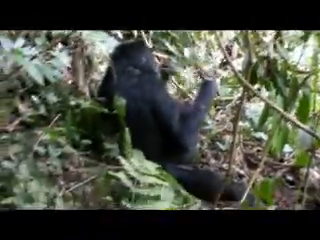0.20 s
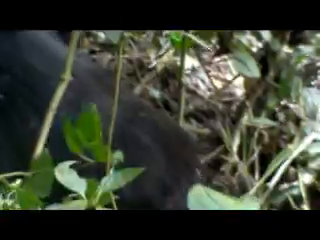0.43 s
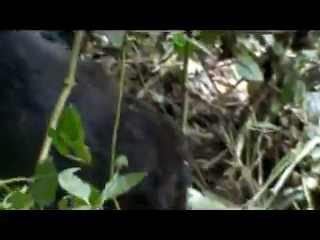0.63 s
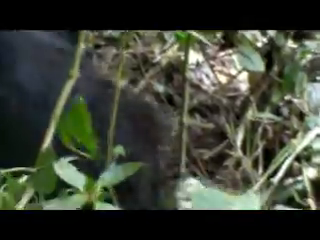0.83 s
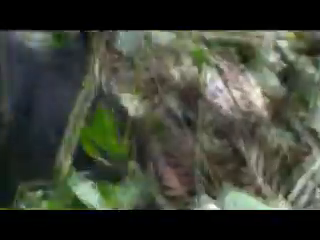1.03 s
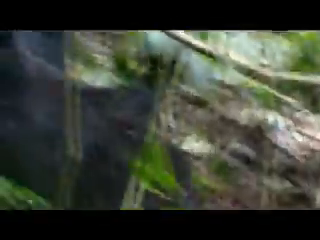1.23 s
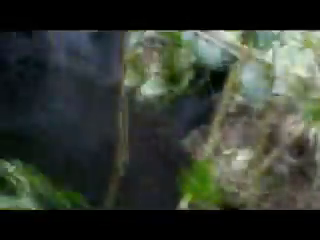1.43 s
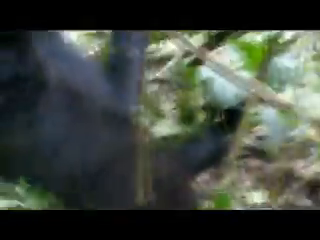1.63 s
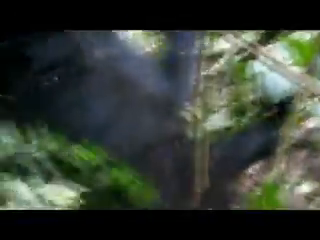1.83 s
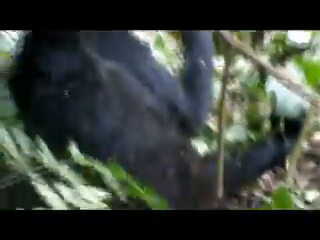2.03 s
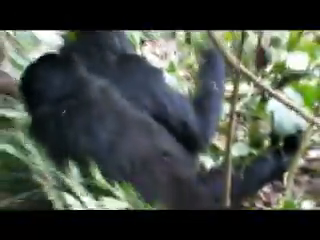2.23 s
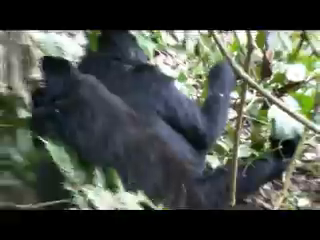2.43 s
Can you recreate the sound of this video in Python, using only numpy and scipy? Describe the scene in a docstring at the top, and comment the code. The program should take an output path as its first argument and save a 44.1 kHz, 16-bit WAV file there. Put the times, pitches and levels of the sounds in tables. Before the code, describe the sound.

Leaves and stems rustle as gorillas pull at plants, with sharp twig snaps and shrilling insects

```python
"""Dense forest undergrowth, where gorillas shift about and pull at plants.
Each pull makes leaves and litter rustle: a swell of tiny clicks and hiss, with short leaf rings.
Twigs snap as a click and a noise spray, a thick stem splinters in jerks, and limbs knock as damped tones.
Insects shrill behind as narrow bands of noise, over a wash of distant foliage and a faint drone.
Early on the whole sound drops out for an instant, then returns slightly louder."""
import sys
import numpy as np
from scipy import signal
from scipy.fft import rfft, irfft
from scipy.io import wavfile

SR = 44100
rng = np.random.default_rng(int(sys.argv[2]) if len(sys.argv) > 2 else 0)


def transcribe(u):
    """Save the signal u as a 16-bit wav file named by the first command-line argument.

    u: samples, shape (n,) or (channels, n), limited to [-1, 1]; the rate is SR.
    q: integer samples, one column per channel.
    """
    v = np.clip(np.atleast_2d(u).T, -1, 1)
    q = np.round(v * 32767).astype(np.int16)
    wavfile.write(sys.argv[1], SR, q)


N = 114660
T = np.arange(N) / SR  # time of every sample, in seconds

# Pulls through the foliage: peak_s, rise_s, fall_s, crisp_leaves_db, dull_litter_db
FOLIAGE_PULLS = [(.15, 0.031, 0.05, -60, -54.5), (0.224, 0.047, 0.024, -47, -52),
                 (.32, 0.069, 0.14, -46.5, -50.5), (0.475, 0.034, 0.03, -44, -51.5),
                 (0.537, 0.037, 0.024, -40.5, -68), (0.603, 0.02, 0.2, -59, -53),
                 (0.685, 0.026, 0.066, -49.5, -42.5), (0.763, 0.033, 0.1, -50, -55),
                 (.92, 0.0062, 0.03, -53, -53.5), (.97, 0.023, 0.084, -51, -53.5),
                 (1.06, 0.04, 0.052, -47, -53.5), (1.13, 0.023, 0.03, -52, -51),
                 (1.262, 0.069, 0.063, -49.5, -51), (1.44, 0.037, 0.075, -55.5, -58.5),
                 (1.582, 0.014, 0.051, -58, -55.5), (1.77, 0.018, 0.016, -52, -53.5),
                 (1.88, 0.039, 0.073, -46.5, -54), (1.956, 0.036, 0.072, -43.5, -52.5),
                 (2.135, 0.043, 0.22, -46, -59), (2.55, 0.04, 0.17, -57, -66)]
# Twigs and fibres snapping: start_s, crack_db, splinters_db, splinter_decay_s, tilt_db_per_octave
TWIG_SNAPS = [(0.2078, -9.5, -30.5, 0.0037, 3), (0.2156, -27, -30, .003, 13),
              (0.2215, -16, -28, 0.0041, -2), (.2280, -7.5, -26, 0.0051, 2.5),
              (0.2335, -8.5, -28, 0.0064, 1.5), (0.5358, -16.5, -42, 0.0025, 4),
              (0.6478, -26, -46, 0.0026, -15.5), (0.7105, -31, -43, .002, -6),
              (0.8684, -21.5, -39.5, 0.0012, -4), (0.9554, -23, -47, 0.0038, -8.5),
              (1.0698, -21, -39, 0.0045, -7.5), (1.1273, -23.5, -51, 0.0027, -3),
              (1.2110, -14, -35, 0.002, 3.5), (1.248, -21, -31.5, 0.00094, 2),
              (1.2599, -30, -43, 0.0026, -11), (1.8834, -13.5, -43, 0.0036, -7),
              (1.886, -12.5, -33.5, 0.0086, -3), (1.94, -25, -43, .003, 5), (1.9502, -19, -50, 0.0016, 9),
              (2.4112, -22.5, -40, 0.0018, 1)]
# Jerks of a thick stem giving way: start_s, level_db, decay_s
STEM_TEARS = [(0.4711, -29.5, 0.0048), (0.485, -34.5, 0.0064), (0.5132, -33, 0.0035), (0.5342, -42, 0.0019)]
# Damped knocks of limbs and sticks, and the short ring of the stem's last crack:
# start_s, level_db, pitch_hz, decay_s
DAMPED_KNOCKS = [(0.205, -48.5, 1345, .014), (.420, -45.5, 728, 0.011), (0.423, -60, 80, 0.012),
                 (0.479, -63, 64.6, 0.035), (.533, -39, 2280, 0.0047), (0.654, -58, 87, 0.044),
                 (.649, -45, 1290, .003), (0.671, -44, 1370, 0.0042), (.689, -42, 2240, 0.0099),
                 (.708, -46, 3520, .008), (1.125, -56, 120, 0.0083), (1.1268, -39, 2000, 0.0027),
                 (1.190, -47.5, 1125, 0.012), (1.473, -61, 56.3, 0.018), (1.578, -63, 72.6, 0.017)]
# Insect voices: pitch_hz, width_hz, first_level_db, later_level_db
INSECT_VOICES = [(5040, 52, -61.5, -65), (5240, 35, -75, -62), (5337, 71, -57, -62), (5570, 65, -68, -62),
                 (5870, 79, -73, -70.5), (6630, 600, -57, -62.5)]
# Sound colour of each material, only the shape matters: frequency_hz, density_db_per_hz
LEAF_COLOUR = [(1000, -26.5), (1800, -15.5), (2600, -6.5), (3700, -3.5), (4700, -11.5), (5500, -3),
               (7200, -0.5), (8500, 1.5), (10300, 2), (11400, -5.5), (12400, -0.5), (14000, -7)]
LITTER_COLOUR = [(30, -21), (90, -8.5), (170, -7), (260, -12.5), (370, -4), (1000, -3.5), (2200, 2),
                 (3600, 0.5), (4600, -3), (5700, -4), (9000, -7), (14000, -4)]
TWIG_COLOUR = [(150, -38), (700, -20.5), (2300, -17), (3600, -0.5), (4800, -8), (5600, -1), (6150, -10),
               (7200, -0.5), (10200, 3.5), (11400, -3), (12500, 1.5), (14000, -1)]
STEM_COLOUR = [(100, -29), (750, -10), (1850, -23), (2260, 6), (2850, -9.5), (3450, 3), (4150, -11),
               (5700, -1), (6500, -5), (9500, -10), (11400, -23), (14000, 3)]
FOREST_COLOUR = [(25, -38), (60, -9), (100, -4), (170, -2.5), (270, -10), (360, -2.5), (550, -1),
                 (1000, -3.5), (2500, 1.5), (3700, 3), (4700, -3), (5400, 4.5), (6150, -1.5), (7000, 3.5),
                 (10000, 3), (14000, -1)]
# Brief dip of the whole sound; the end values hold before and after it: time_s, level_db
LEVEL_DIP = [(0.377, 0.5), (.380, -15), (.397, -27.5), (.404, -16), (.419, -1), (.421, 2.5)]

CUTOFF_HZ = 13400  # almost nothing is heard above this
TILT_ABOVE_HZ = 4800  # snaps differ in brightness above this
FLICKER_HZ = 47  # usual upper speed of the random wavering
FOREST_DB, FOREST_FLICKER_DB = -54, 1.07
MURMUR_HZ, MURMUR_WIDTH_HZ, MURMUR_DB = 392, 97, -75.5  # a faint distant drone
CHORUS_SHIFT_END_S = 0.46  # insect balance changes from half this time until this time
INSECT_THROB_DB = 1  # the shrilling comes in irregular beads
KNOCK_WIDTH, KNOCK_SCUFF = 0.11, 0.49  # scuff width as a share of pitch; its strength beside the tone
STEM_RING_HZ, STEM_RING_WIDTH_HZ = 2227, 66
STEM_RING_DB, STEM_RING_S = -11, 0.0049  # level relative to each jerk; decay
TEAR_CRACK_DB = 10  # opening crack of a jerk, relative to its spray
SCATTER_DB, SCATTER_DECAY_S = -10, 0.045  # echoes off nearby stems
LEAF_GRAINS_PER_S, LEAF_SPREAD_DB, LEAF_HISS = 3000, 3.5, 0.87
LITTER_GRAINS_PER_S, LITTER_SPREAD_DB, LITTER_HISS = 1800, 3, 0.63
LITTER_FLICKER_DB = 0.9
LEAF_RING_S, LEAF_RING_SHARE = 0.0033, 0.5  # ring decay; strength beside the clicks
PATCHY_DB, PATCHY_HZ = 1.42, 16.8  # depth and upper speed of each rustle band's own wavering


def from_db(db):
    """Turn decibels into a gain."""
    return 10 ** (np.asarray(db) / 20)


def rms_one(x):
    """Scale to an rms (average strength) of one."""
    return x / np.sqrt(np.mean(x ** 2) + 1e-20)


def coloured(x, spectrum, tilt_db=0, size=4096):
    """Give a sound a material's colour, with a filter of unit power that never rings ahead of time."""
    hz, db = np.transpose(spectrum)
    octave = np.log2(np.maximum(np.fft.rfftfreq(size, 1 / SR), 10))
    shape = np.interp(octave, np.log2(hz), db)
    shape = shape + tilt_db * np.maximum(octave, np.log2(TILT_ABOVE_HZ))
    top_cut = 60 * np.maximum(octave - np.log2(CUTOFF_HZ), 0)  # dB
    gain = rms_one(from_db(shape - top_cut))
    # Folding the cepstrum puts the filter's energy as early as possible
    cepstrum = irfft(np.log(gain + 1e-9))
    cepstrum[1:size // 2] *= 2
    cepstrum[size // 2 + 1:] = 0
    response = irfft(np.exp(rfft(cepstrum)))
    return signal.oaconvolve(x, response)[:N]


def settled_noise(sos):
    """Filter random noise, dropping the first second while the filter settles; rms one."""
    return rms_one(signal.sosfilt(sos, rng.standard_normal(N + SR))[SR:])


def band_noise(hz, width_hz):
    """Noise squeezed into one band around a pitch, rms one."""
    edges = [max(hz - width_hz / 2, 10), hz + width_hz / 2]
    return settled_noise(signal.butter(2, edges, "band", fs=SR, output="sos"))


def flicker(depth_db, speed_hz=FLICKER_HZ):
    """A gain that wavers at random, following slow noise."""
    return from_db(depth_db * settled_noise(signal.butter(2, speed_hz, fs=SR, output="sos")))


def dying(start_s, decay_s):
    """A sudden start, then an exponential fade."""
    return (T >= start_s) * np.exp(-np.clip((T - start_s) / decay_s, 0, 40))


def crackle(per_s, spread_db, hiss):
    """Tiny clicks of uneven size over the blur of more distant ones, rms one."""
    sizes = from_db(spread_db * np.minimum(rng.exponential(1, N), 4))
    sizes = sizes * rng.choice([-1, 1], N)
    clicks = rms_one(sizes * (rng.random(N) < per_s / SR))
    return rms_one(clicks + hiss * rng.standard_normal(N))


def forest():
    """Insects shrill in narrow noise bands over a faint wash of distant foliage and a drone."""
    insects = np.zeros(N)
    shift_s = [CHORUS_SHIFT_END_S / 2, CHORUS_SHIFT_END_S]
    for hz, width_hz, first_db, later_db in INSECT_VOICES:
        level_db = np.interp(T, shift_s, [first_db, later_db])
        insects += from_db(level_db) * band_noise(hz, width_hz)
    foliage = flicker(FOREST_FLICKER_DB) * crackle(per_s=3000, spread_db=3.0, hiss=1.57)
    wash = from_db(FOREST_DB) * coloured(foliage, FOREST_COLOUR)
    drone = from_db(MURMUR_DB) * band_noise(MURMUR_HZ, MURMUR_WIDTH_HZ)
    return insects * flicker(INSECT_THROB_DB) + wash + drone


def scatter(x):
    """Surrounding plants return brief, blurred echoes: a fading burst of noise as the filter."""
    echoes = dying(0.00065, SCATTER_DECAY_S) * rng.standard_normal(N)
    echoes = echoes / np.sqrt(np.sum(echoes ** 2))
    return from_db(SCATTER_DB) * signal.fftconvolve(x, echoes)[:N]


def knocks():
    """Knocks and the ring of the stem's last crack: damped tones with a scuff around their pitch."""
    out = np.zeros(N)
    for start_s, db, hz, decay_s in DAMPED_KNOCKS:
        ring = np.sin(2 * np.pi * hz * (T - start_s))
        scuff = KNOCK_SCUFF * band_noise(hz, KNOCK_WIDTH * hz + 40)
        envelope = dying(start_s, decay_s) - dying(start_s, decay_s / 8)  # softened start
        out += from_db(db) * envelope * (ring + scuff)
    return out


def stem():
    """Each jerk cracks the stem, and a burst of breaking fibres rings in its hollow."""
    strain, ring = np.zeros(N), np.zeros(N)
    for start_s, db, decay_s in STEM_TEARS:
        strain += from_db(db) * dying(start_s, decay_s)
        ring += from_db(db + STEM_RING_DB) * dying(start_s, STEM_RING_S)
    force = strain * crackle(per_s=6000, spread_db=0.0, hiss=0.45)
    for start_s, db, decay_s in STEM_TEARS:
        force[int(start_s * SR)] += from_db(db + TEAR_CRACK_DB)
    return coloured(force, STEM_COLOUR) + ring * band_noise(STEM_RING_HZ, STEM_RING_WIDTH_HZ)


def twigs():
    """Each snap is one sharp crack, then a short spray of splintering fibres."""
    out = np.zeros(N)
    for start_s, crack_db, splinters_db, decay_s, tilt_db in TWIG_SNAPS:
        force = from_db(splinters_db) * dying(start_s, decay_s) * rng.standard_normal(N)
        force[int(start_s * SR)] += from_db(crack_db)
        out += coloured(force, TWIG_COLOUR, tilt_db)
    return out


def leaf_rings(clicks, low_hz, high_hz, count=40):
    """Each click lands on one of many leaves and adds that leaf's short ring."""
    leaf_hit = rng.integers(0, count, N)
    r = np.exp(-1 / (LEAF_RING_S * SR))  # how much of a ring is left after one sample
    pitches_hz = np.linspace(low_hz, high_hz, count) * rng.uniform(1.0, 1.05, count)
    rings = np.zeros(N)
    for leaf, hz in enumerate(pitches_hz):
        w = 2 * np.pi * hz / SR
        hits = clicks * (leaf_hit == leaf) + 1e-18
        rings += signal.lfilter([np.sin(w)], [1, -2 * r * np.cos(w), r * r], hits)
    return rms_one(clicks + LEAF_RING_SHARE * rms_one(rings))


def patchy(x, count=14):
    """Different leaves speak from moment to moment: overlapping pitch bands waver separately."""
    height = np.sqrt(np.fft.rfftfreq(N, 1 / SR) / CUTOFF_HZ)
    place = np.interp(height, [0, 1], [0, count - 1])
    spectrum = rfft(x)
    out = np.zeros(N)
    for k in range(count):
        share = np.maximum(1 - np.abs(place - k), 0)
        out += irfft(spectrum * share, N) * flicker(PATCHY_DB, PATCHY_HZ)
    return out


def rustle():
    """Each pull swells and dies away, setting leaves and ground litter crackling."""
    crisp_power, dull_power = np.zeros(N), np.zeros(N)
    for peak_s, rise_s, fall_s, leaves_db, litter_db in FOLIAGE_PULLS:
        away_s = T - peak_s
        fading = np.where(away_s < 0, (away_s / rise_s) ** 2, away_s / fall_s)
        swell = np.exp(-np.minimum(fading, 40))
        crisp_power += (from_db(leaves_db) * swell) ** 2
        dull_power += (from_db(litter_db) * swell) ** 2
    leaf_clicks = crackle(LEAF_GRAINS_PER_S, LEAF_SPREAD_DB, LEAF_HISS)
    leaves = np.sqrt(crisp_power) * leaf_rings(leaf_clicks, low_hz=1946, high_hz=13160)
    litter_clicks = crackle(LITTER_GRAINS_PER_S, LITTER_SPREAD_DB, LITTER_HISS)
    litter = np.sqrt(dull_power) * leaf_rings(litter_clicks, low_hz=607, high_hz=12020)
    litter = litter * flicker(LITTER_FLICKER_DB)
    return patchy(coloured(leaves, LEAF_COLOUR) + coloured(litter, LITTER_COLOUR))


def scene():
    """Add the forest, the knocks, the breaking plants with their echoes, and the rustling."""
    breaks = twigs() + stem()
    return (forest() + knocks() + breaks + scatter(breaks) + rustle())[None]


def record(dry):
    """The level dips briefly and settles slightly higher, and the highest treble is cut."""
    time_s, db = np.transpose(LEVEL_DIP)
    dipped = dry * from_db(np.interp(T, time_s, db))
    return signal.sosfilt(signal.ellip(12, .2, 80, CUTOFF_HZ, fs=SR, output="sos"), dipped)


dry = scene()
out = record(dry)
transcribe(out)
```